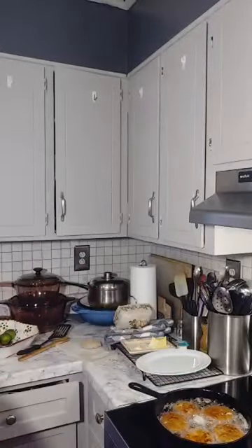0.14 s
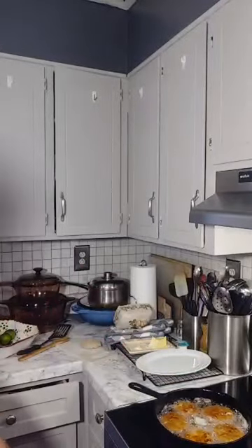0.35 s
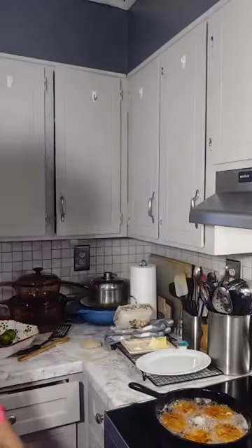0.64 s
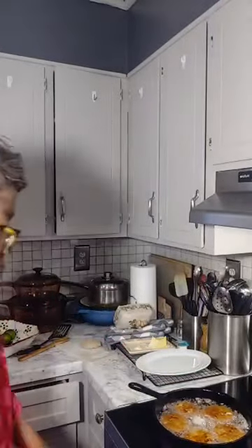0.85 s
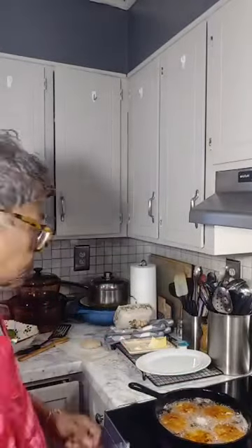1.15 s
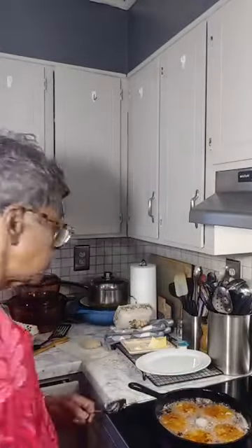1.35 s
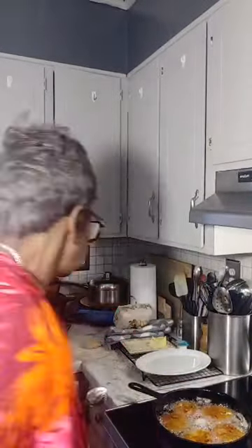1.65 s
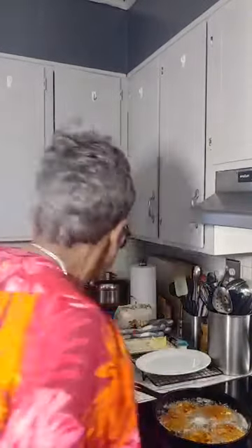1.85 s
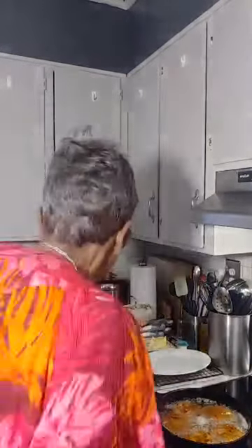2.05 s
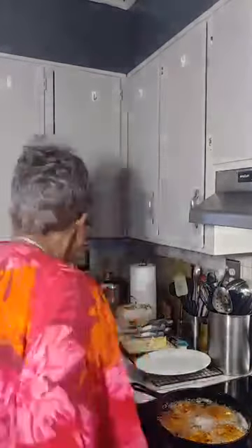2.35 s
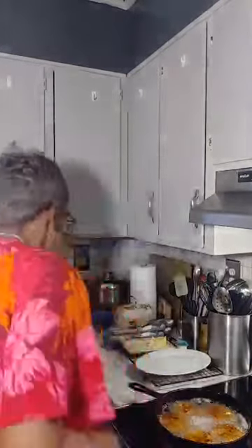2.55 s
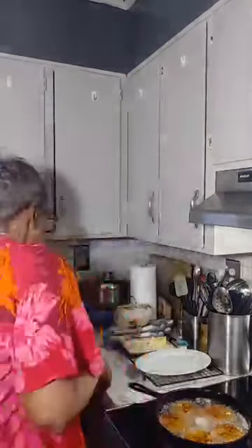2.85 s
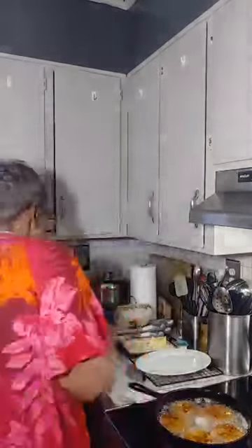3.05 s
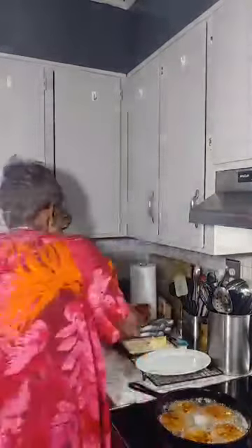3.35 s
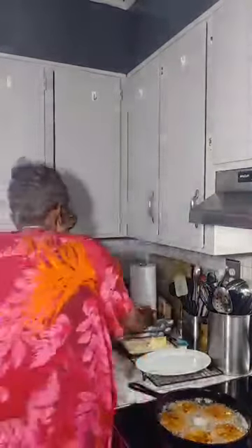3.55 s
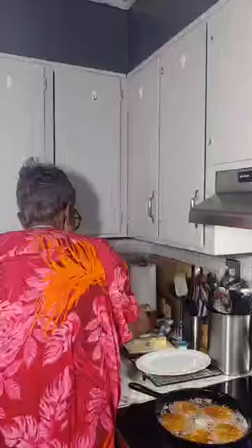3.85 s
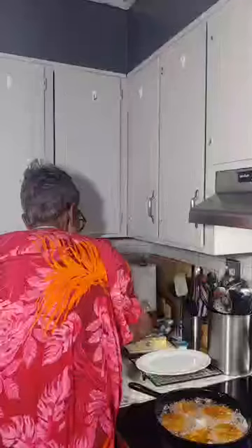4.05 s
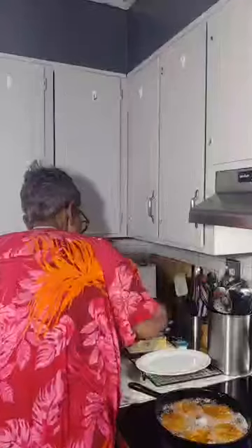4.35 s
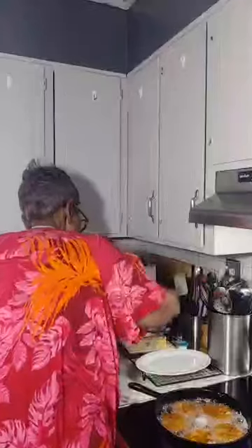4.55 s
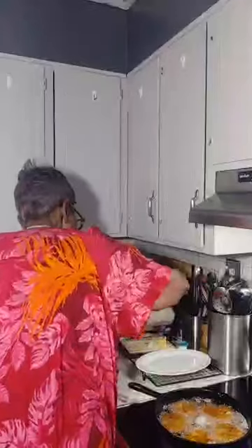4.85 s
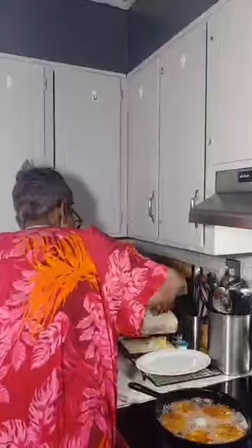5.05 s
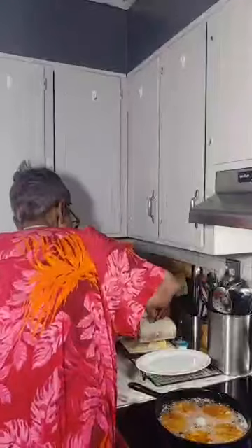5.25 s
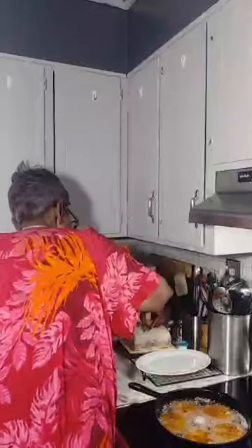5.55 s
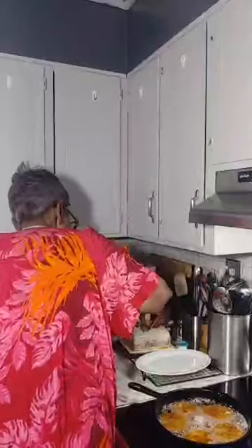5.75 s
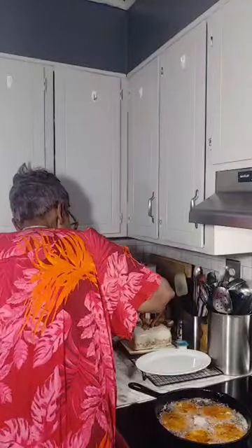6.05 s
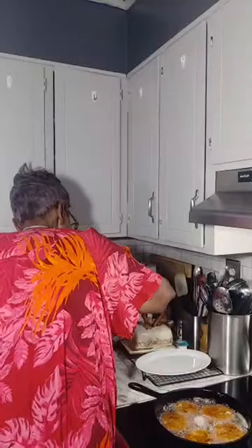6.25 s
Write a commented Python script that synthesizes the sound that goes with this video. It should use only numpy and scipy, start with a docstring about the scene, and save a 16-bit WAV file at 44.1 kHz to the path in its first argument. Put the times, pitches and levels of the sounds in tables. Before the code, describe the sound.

A faint frying sizzle and a low cooker hood hum run throughout in a small, hard-walled kitchen, heard from near the counter. A tiny tick comes at 0.4 seconds. A plate clinks at 1.2 and tongs click sharply at 1.5. A utensil softly scrapes a dish from 1.7 to 2.1. A spoon clinks brightly at 2.2, a plate at 2.6 and tongs at 3, followed by a quick double knock on the counter. A spoon, knife and plate clink between 3.5 and 3.9, and a lid at 4.4, then comes a shorter scrape and a tick. The loudest moment is a clatter of bowl, fork and tub from 5.5 to 5.7. A cup is tapped lightly at 5.8 and a board faintly at 6.3. The background stays muted, lifting briefly with each hit, and every short echo is cut off quickly.

```python
"""A small, hard kitchen, heard from a camera microphone near the counter. A pan sizzles and a hood hums
throughout. A cap ticks, a plate and tongs clink, a utensil scrapes a dish. Spoon, plate and tongs
follow, then two knocks on the counter at 3 s, a knife, a lid and a shorter scrape. Near 5.5 s a bowl,
fork and tub clatter; a cup and a board are tapped last. The camera's noise suppressor holds the sizzle
down, opens for each blow and shuts on its echo."""
import sys
import numpy as np
from scipy import signal
from scipy.fft import rfft, irfft, next_fast_len
from scipy.io import wavfile
from scipy.ndimage import uniform_filter1d

SR = 44100
rng = np.random.default_rng(int(sys.argv[2]) if len(sys.argv) > 2 else 0)


def inscribe(sig):
    """Save sig as 16-bit PCM at rate SR to the path in sys.argv[1].

    A 1-D sig is mono; a 2-D sig holds one channel per row.
    Samples are clipped to [-1, 1] before scaling.
    """
    pcm = np.round(np.clip(np.atleast_2d(sig).T, -1, 1) * 32767)
    wavfile.write(sys.argv[1], SR, pcm.astype(np.int16))


N = 281975

# spectrum of the frying pan and room hum: (frequency [Hz], level per Hz [dB])
SIZZLE_SPECTRUM = [(30, -9.5), (130, 5.5), (330, -1), (630, -4), (1250, -8), (2000, -6.5), (3200, -7),
                   (5000, -5.5), (6300, -1.5), (9000, -11), (13000, 1.5), (16000, -7.5)]
# the sizzle through the microphone, ahead of the suppressor: (time [s], level [dB])
SIZZLE_LEVEL = [(0, -41), (.33, -40), (.4, -37), (1.1, -39), (1.6, -34), (2.1, -35), (2.8, -36.5),
                (3.6, -35), (4.3, -36.5), (4.7, -35), (5.2, -37.5), (5.9, -34), (6.08, -36.5), (6.39, -36)]
# resonances of the cooker hood and of a rubbed dish: (frequency [Hz], width [Hz], level [dB])
HOOD_MODES = [(120, 25, 0), (150, 20, 0), (185, 20, 0), (340, 25, -2)]
DISH_LOW = [(1050, 70, 0), (1580, 50, -2), (1720, 60, -3)]
DISH_HIGH = [(2300, 400, -12), (2940, 100, -2), (3900, 400, -12), (6100, 600, -16)]
# strokes over a dish: (start [s], length [s], level [dB], hardest press at [s], pressure there [dB])
SCRAPES = [(1.72, .42, -42, 1.895, 6), (4.6, .23, -41, 4.75, -4)]
# the kitchen's reverberation: (frequency [Hz], t60 [s])
KITCHEN_T60 = [(150, .4), (600, .4), (2000, .43), (6000, .41), (14000, .31)]
# echoes off the nearby counter and tiles: (frequency [Hz], level over the kitchen's echo [dB])
NEAR_ECHOES = [(200, -12), (1500, -8), (6000, -5), (10000, 1.5), (16000, 1.5)]
# modes of each struck thing: (frequency [Hz], level [dB], t60 [s])
PLATE = [(552, -12, .08), (1545, 0, .1), (1590, -5, .08), (1690, -1, .1), (2805, -8, .07), (3860, -10, .04),
         (5415, -7, .08), (6600, -10, .06), (6690, -12, .06)]
BOWL = [(1726, 4.5, .07), (2810, -1, .07), (3805, 4, .07), (3950, 2, .06), (4880, -23.5, .05),
        (5905, -11, .07), (6205, -2, .06), (6310, -6, .07), (8450, -12, .03)]
SPOON = [(1010, -18, .05), (1733, -17.5, .07), (2150, -20.5, .05), (2860, -12, .06), (2970, -14.5, .05),
         (3780, -12.5, .04), (3940, -7, .06), (5240, -14.5, .04), (5890, -4, .08), (6120, -5, .04),
         (6315, 0, .06), (6515, -7, .05)]
TONGS = [(1065, -18, .05), (1716, -13, .05), (2917, -12, .05), (3800, -6, .05), (3935, -3, .09),
         (4177, -14, .05), (5695, -16, .04), (6852, -12, .05)]
LID = [(590, -12, .06), (1571, -2.5, .06), (1776, -1.5, .06), (2240, -17, .05), (2745, -4, .06),
       (3780, -7.5, .06), (3897, 0.5, .06), (6050, -1, .06), (6847, 3, .06)]
KNIFE = [(2110, -6.5, .05), (3273, -4.5, .05), (4382, 1.5, .1), (4726, 0, .06), (5910, -7, .08),
         (6933, -12, .05)]
COUNTER = [(148, -0.5, .1), (350, -13, .07), (495, -4, .07), (545, -6, .07), (663, -5, .07), (818, -2, .07),
           (1000, -6.5, .05), (2130, -14, .04)]
TUB = [(549, 0, .08), (893, -4.5, .08), (1421, -8, .05), (2433, -10, .05)]
BOARD = [(552, 0, .08), (1055, -2, .06)]
CUP = [(430, 0, .09), (900, -18, .05)]
CAP = [(2200, 0, .03), (3700, -8, .03), (6400, -4, .03)]
FORK = [(12300, -3, .02), (12800, -3, .03), (14062, 0, .2)]
# contact noises, a crack, a metallic tick and a thud: (frequency [Hz], level per Hz [dB])
CRACK = [(200, -30), (800, -19), (2000, 1.5), (4000, 3), (6500, 2), (8000, 0.5), (11000, -7), (16000, -13)]
TICK = [(4000, -40), (7000, -8), (8500, 0.5), (11000, -6), (16000, -18)]
THUD = [(60, -11), (150, 0.5), (500, -5), (1000, -6.5), (2000, -22), (4000, -51.5)]
# thing: (modes, thud over crack [dB], tick over crack [dB],
# how long its echo is heard [x the kitchen's t60])
THINGS = { "plate": (PLATE, -30, -10, 1.02), "bowl": (BOWL, -23, -14, 1.22), "spoon": (SPOON, -31, 3, .95),
          "tongs": (TONGS, -14, -3, .9), "lid": (LID, -11, -2, .98), "knife": (KNIFE, -2, -4, .84),
          "counter": (COUNTER, -4, -14, 1.12), "tub": (TUB, -8, -14, 1.05), "board": (BOARD, -2, -10, 1.05),
          "cup": (CUP, -2, -14, 1.1), "cap": (CAP, 3, -6, .92), "fork": (FORK, -12, 8, .95), }
# blows on dishes and counter: (thing, time [s], ring level [dB], crack level [dB])
BLOWS = [ ("cap", .365, -42, -43), ("plate", 1.2008, -19, -28), ("board", 1.4617, -35, -49),
         ("tongs", 1.511, -38, -29), ("tongs", 1.5265, -24, -17), ("spoon", 2.2045, -15, -23),
         ("plate", 2.589, -18, -23), ("plate", 2.597, -18, -25), ("board", 2.78, -43, -56),
         ("tongs", 2.9645, -22, -33), ("tongs", 2.982, -25, -35), ("counter", 3.1364, -17, -16),
         ("counter", 3.17, -22, -21), ("spoon", 3.4636, -18, -28), ("knife", 3.6737, -21, -21.5),
         ("tongs", 3.775, -34, -42), ("plate", 3.9131, -24, -29), ("tongs", 3.9135, -28, -36),
         ("board", 4.27, -44, -55), ("lid", 4.4334, -20, -22), ("cap", 4.832, -35, -38),
         ("counter", 5.33, -44, -57), ("bowl", 5.4771, -15, -18.5), ("bowl", 5.500, -22, -22),
         ("bowl", 5.6467, -16, -17), ("fork", 5.648, -16, -38), ("tub", 5.684, -19, -29),
         ("cup", 5.8392, -33, -44), ("board", 6.2593, -42, -45), ]
# response of the camera microphone: (frequency [Hz], gain [dB])
MICROPHONE = [(25, -32), (70, -25.5), (115, -3), (6800, 2), (7200, -3), (7600, -16.5), (16000, -33.5)]
# how far a suppressor band follows its own level, not the total: (frequency [Hz], share [0-1])
OWN_SHARE = [(250, .8), (900, .4), (1500, .16), (16000, .12)]
# spectrum of the recorder's hiss: (frequency [Hz], level per Hz [dB])
HISS_SPECTRUM = [(20, 0), (60, -2), (120, -8), (400, -25), (8000, -34), (13000, -20), (15700, -17),
                 (16000, -26)]


def gain_of(db):
    """Decibels to an amplitude factor."""
    return 10 ** (np.asarray(db) / 20)


def unit_rms(x):
    """Scales to rms 1."""
    return x / np.sqrt(np.mean(x ** 2) + 1e-20)


def curve_at(points, hz):
    """Reads a table along straight lines on a log-frequency axis."""
    f, value = np.transpose(points)
    return np.interp(np.log(hz + 1), np.log(f + 1), value)


def add(mix, start_s, sound):
    """Mixes a sound in at its start time."""
    part = mix[round(start_s * SR):][:len(sound)]
    part += sound[:len(part)]


def impulse_of(spectrum, size=4096):
    """Minimum-phase impulse response of a spectrum."""
    log_gain = np.log(gain_of(curve_at(spectrum, abs(np.fft.fftfreq(size, 1 / SR)))))
    return np.fft.ifft(np.exp(np.conj(signal.hilbert(log_gain)))).real[:size // 2]


def resonant_noise(modes, size):
    """Noise through a set of resonances, at rms 1."""
    fast = next_fast_len(size)
    hz = np.fft.rfftfreq(fast, 1 / SR)
    shape = sum(gain_of(db) / np.sqrt(1 + (2 * (hz - f) / width) ** 2) for f, width, db in modes)
    return unit_rms(irfft(rfft(rng.standard_normal(fast)) * shape, fast)[:size])


def microphone(x):
    """The camera microphone loses the deep bass and the treble above 7 kHz."""
    return signal.oaconvolve(x, impulse_of(MICROPHONE))[:N]


def cooker_hood(level_db=-50):
    """The fan hums steadily in the background: noise in four low resonances."""
    return gain_of(level_db) * resonant_noise(HOOD_MODES, N)


def sizzle(patchy_db=2.0):
    """The frying pan: noise whose spectrum flickers in random patches while its level drifts."""
    frames, hz = N // 128 + 5, np.fft.rfftfreq(512, 1 / SR)
    real, imag, patches = rng.standard_normal((frames, len(hz), 3)).T
    patches = uniform_filter1d(patches, size=6, axis=0)  # about 500 Hz wide
    patches = unit_rms(uniform_filter1d(patches, size=20, axis=1))  # about 60 ms long
    spectra = (real + 1j * imag) * gain_of(curve_at(SIZZLE_SPECTRUM, hz)[:, None] + patchy_db * patches)
    noise = signal.istft(spectra, nperseg=512, noverlap=384)[1][:N]
    level_db = np.interp(np.arange(N) / SR, *np.transpose(SIZZLE_LEVEL))
    return noise / np.std(microphone(noise)) * gain_of(level_db)


def scrape(length_s, level_db, press_at_s, press_db, light_db=-6, press_s=.045):
    """A utensil rubs a dish; pressing harder makes it louder and brings out the high resonances."""
    t = np.arange(0, length_s, 1 / SR)
    stroke = np.clip(np.minimum(t / .05, (length_s - t) / .08), 0, 1)  # 50 ms rise, 80 ms fall
    extra_db = (press_db - light_db) * np.exp(-((t - press_at_s) / press_s) ** 2)
    low, high = (resonant_noise(modes, SR)[:len(t)] for modes in (DISH_LOW, DISH_HIGH))
    return stroke * gain_of(level_db + .3 * extra_db) * (low + gain_of(light_db + extra_db) * high)


def kitchen_echo(echo_stretch, gap_s=.002, near_t60_s=.09):
    """Quick echoes from close by, and dense ones off tiles and cupboards that die band by band."""
    taps = np.zeros(SR // 3)
    slots = np.arange(0, len(taps) - 20, 20)  # one echo of random sign in every 20 samples
    taps[slots + rng.integers(0, 20, len(slots))] = rng.choice([-1., 1.], len(slots))
    taps[:round(gap_s * SR)] = 0
    hz, t, spectra = signal.stft(taps, SR, nperseg=256)
    far = gain_of(-60 * t / (echo_stretch * curve_at(KITCHEN_T60, hz)[:, None]))
    near = gain_of(curve_at(NEAR_ECHOES, hz)[:, None] - 60 * t / near_t60_s)
    return signal.istft(spectra * np.hypot(far, near), SR, nperseg=256)[1]


def blow(thing, ring_db, crack_db, contact_s=.004):
    """A struck thing rings, cracks, ticks and thuds, reaching the microphone directly and by echo."""
    modes, thud_db, tick_db, echo_stretch = THINGS[thing]
    hz, db, t60 = np.transpose(modes)[:, :, None]
    t = np.arange(2048) / SR
    decays = gain_of(db - 60 * t / t60) / np.sqrt(t60)  # a mode's level sets its energy
    ring = (decays * np.sin(2 * np.pi * hz * t)).sum(0)
    ring *= np.cos(np.pi / 2 * t / t[-1])  # the hand soon damps what is left
    sources = [ring, impulse_of(CRACK), impulse_of(TICK), impulse_of(THUD)]
    paths = np.tile(kitchen_echo(echo_stretch), (len(sources), 1))
    chatter = rng.standard_normal(len(t)) * np.exp(-t / contact_s)
    paths[0, 0] += gain_of(13)  # the direct ring stands above any single echo
    paths[1:, :len(t)] += gain_of(11) * chatter / np.linalg.norm(chatter)  # the direct contact chatters
    parts = signal.fftconvolve(sources, paths, axes=1)
    onset_rms = np.sqrt(np.mean(parts[:, :SR // 25] ** 2, axis=1))  # levels hold over the first 40 ms
    gains = gain_of([ring_db, crack_db, crack_db + tick_db, crack_db + thud_db]) / onset_rms
    return gains @ parts


def scene():
    """The kitchen at the microphone, in mono: blows and scrapes over the pan and the hood."""
    mix = sizzle() + cooker_hood()
    for thing, start_s, ring_db, crack_db in BLOWS:
        add(mix, start_s, blow(thing, ring_db, crack_db))
    for start_s, length_s, level_db, hardest_s, press_db in SCRAPES:
        add(mix, start_s, scrape(length_s, level_db, hardest_s - start_s, press_db))
    return mix[None]


def noise_suppressor(x, depth_db=18., shut_db=5., span_db=9.5, learns_db=-18., memory_s=.12):
    """Holds each band down until the sound rises above what the camera takes for background."""
    hz, t, spectra = signal.stft(x, SR, nperseg=1024, noverlap=768)
    power = uniform_filter1d(abs(spectra) ** 2, size=11, axis=0) + 1e-20
    keep = np.exp(-t[1] / memory_s)
    recent = signal.lfilter([1 - keep], [1, -keep], power, axis=1)
    # a sound that lasts soon counts toward the background
    background = np.percentile(power, 30, axis=1)[:, None] + gain_of(2 * learns_db) * recent
    band_db = 10 * np.log10(power / background)
    total_db = 10 * np.log10(power.sum(0) / background.sum(0))
    own = curve_at(OWN_SHARE, hz)[:, None]
    above_db = own * band_db + (1 - own) * total_db
    lift_db = depth_db * np.clip((above_db - shut_db) / span_db, 0, 1)
    lift_db = uniform_filter1d(lift_db, size=3, axis=1)  # the gain glides from frame to frame
    return signal.istft(spectra * gain_of(lift_db - depth_db), SR, nperseg=1024, noverlap=768)[1][:N]


def record(dry, hiss_db=-85, edge_hz=16450):
    """Inside the camera: microphone colour, noise suppressor, recorder hiss, band limit."""
    suppressed = noise_suppressor(microphone(dry[0]))
    hiss = unit_rms(signal.oaconvolve(rng.standard_normal(N), impulse_of(HISS_SPECTRUM), "same"))
    lowpass = signal.firwin(511, edge_hz, window=("kaiser", 9), fs=SR)
    return signal.oaconvolve(suppressed + gain_of(hiss_db) * hiss, lowpass, "same")[None]


dry = scene()
out = record(dry)
inscribe(out)
```